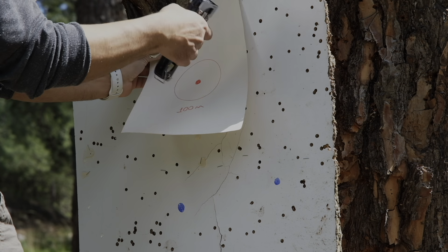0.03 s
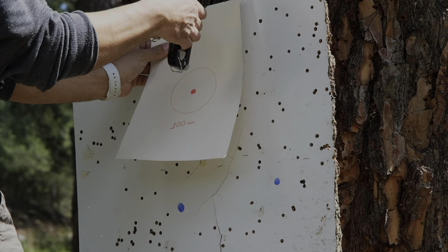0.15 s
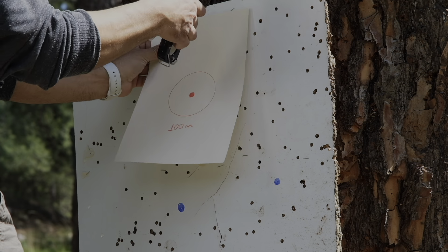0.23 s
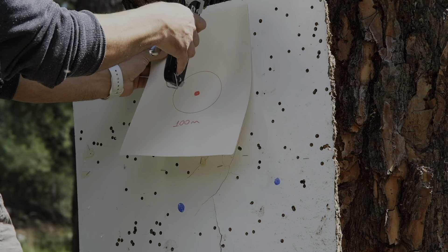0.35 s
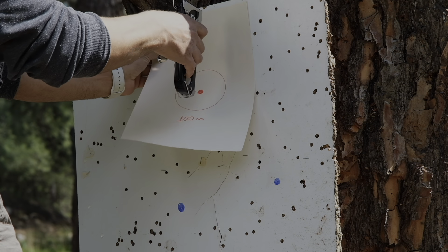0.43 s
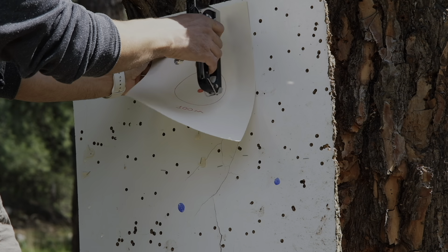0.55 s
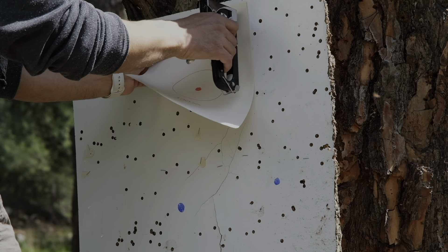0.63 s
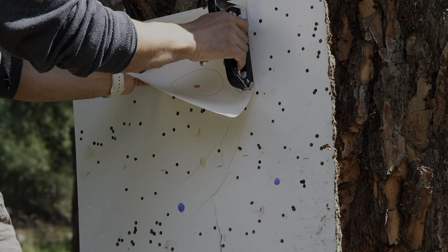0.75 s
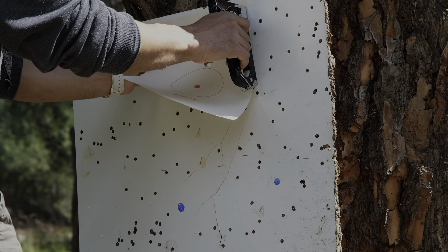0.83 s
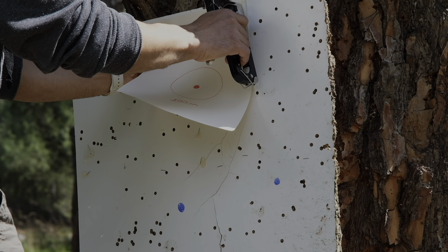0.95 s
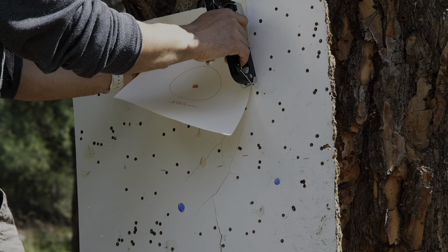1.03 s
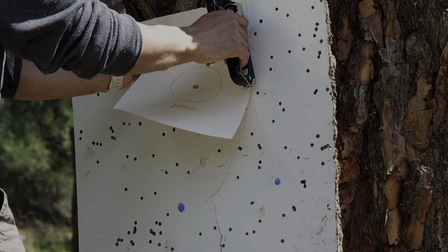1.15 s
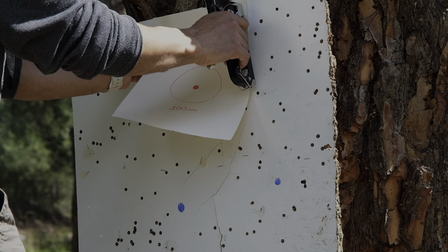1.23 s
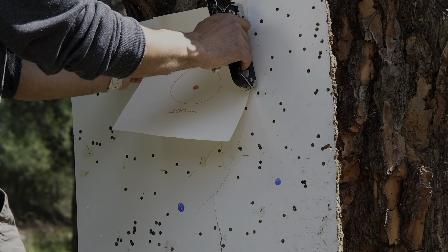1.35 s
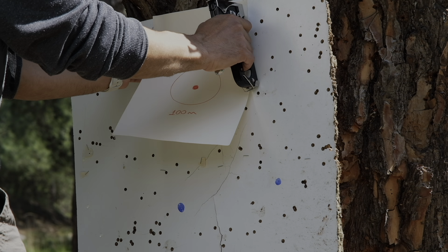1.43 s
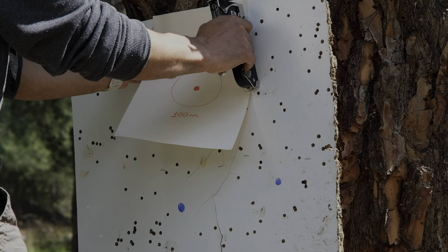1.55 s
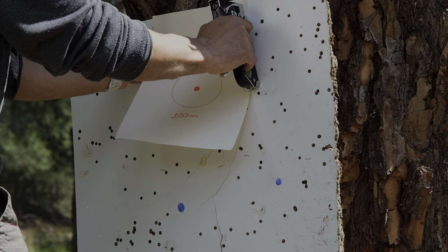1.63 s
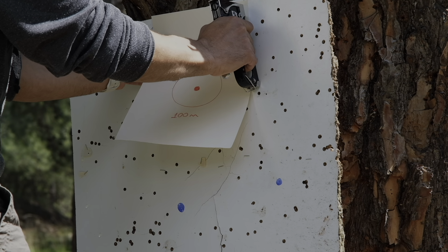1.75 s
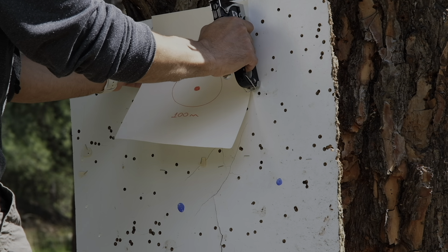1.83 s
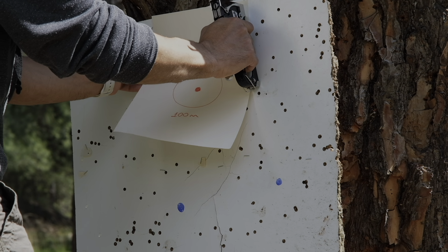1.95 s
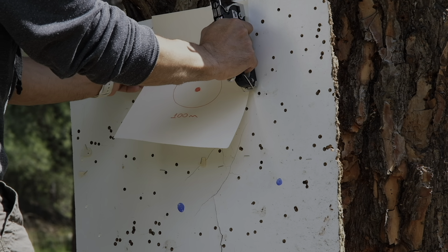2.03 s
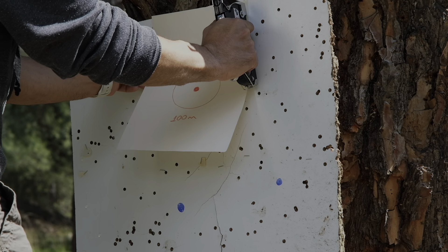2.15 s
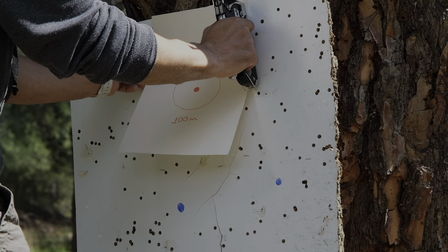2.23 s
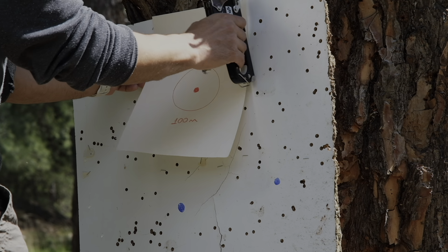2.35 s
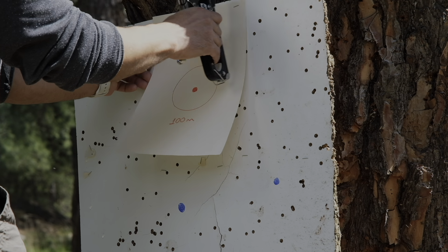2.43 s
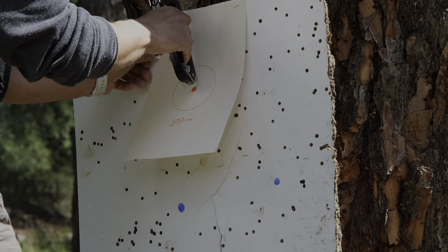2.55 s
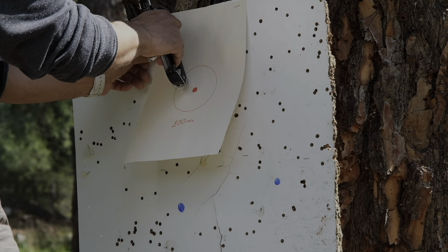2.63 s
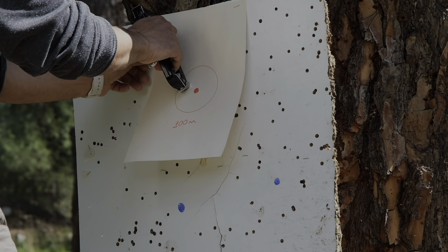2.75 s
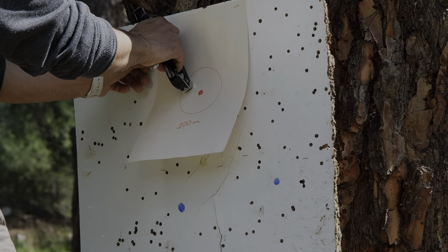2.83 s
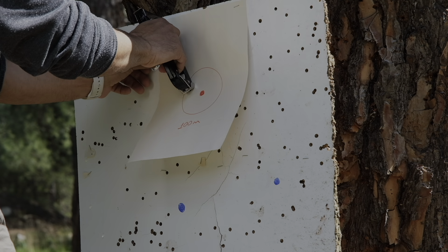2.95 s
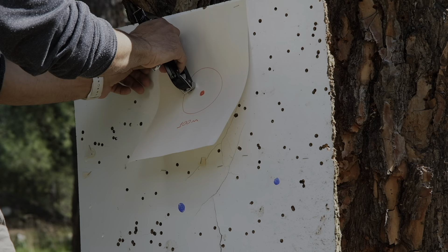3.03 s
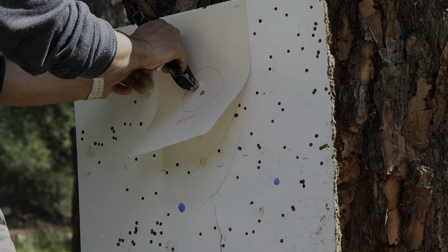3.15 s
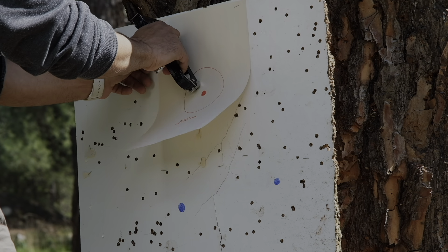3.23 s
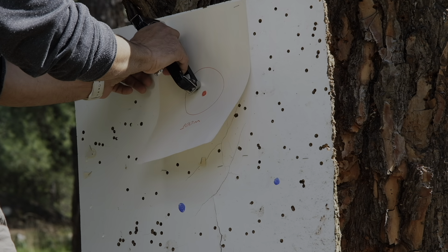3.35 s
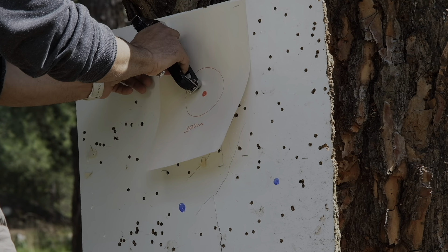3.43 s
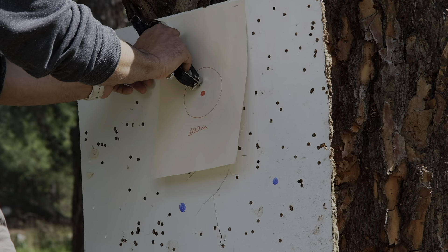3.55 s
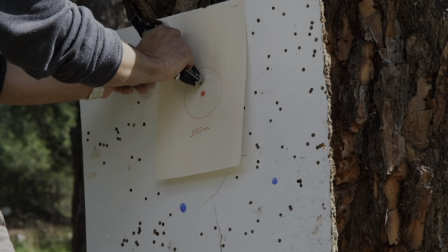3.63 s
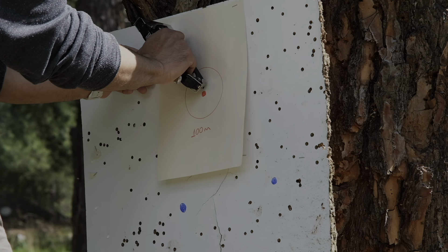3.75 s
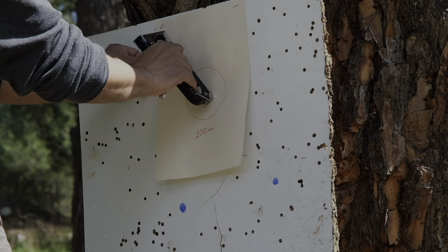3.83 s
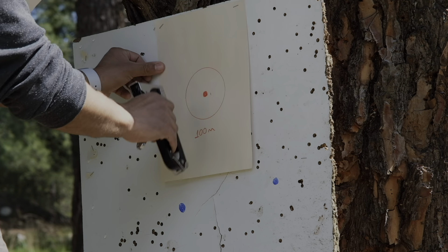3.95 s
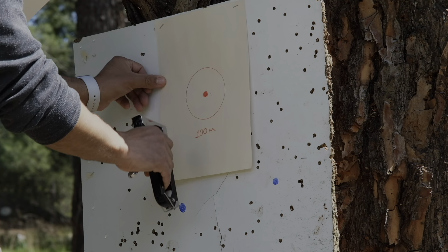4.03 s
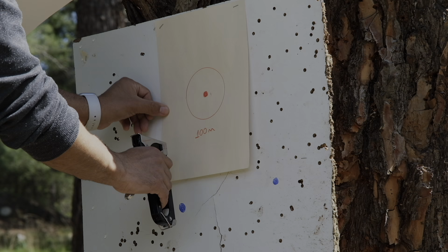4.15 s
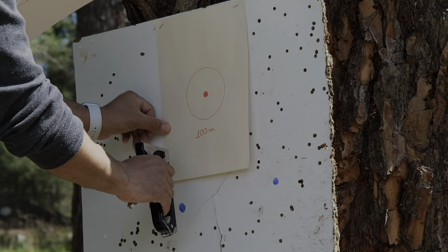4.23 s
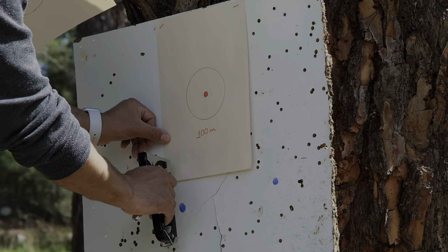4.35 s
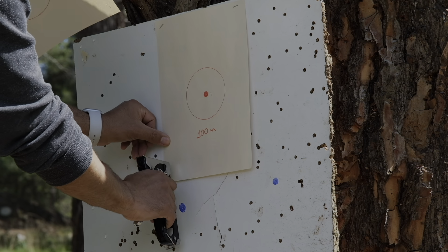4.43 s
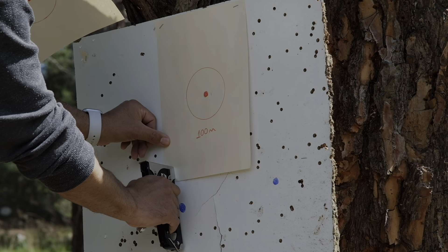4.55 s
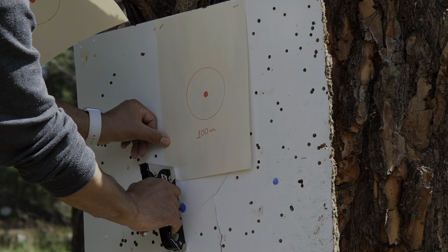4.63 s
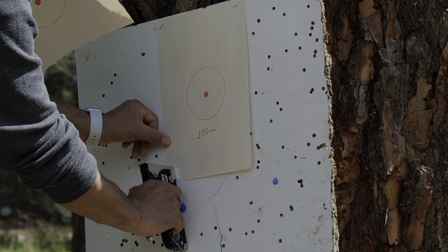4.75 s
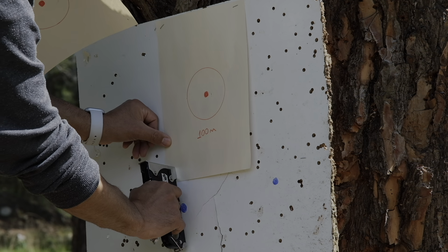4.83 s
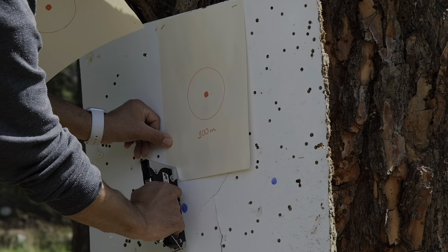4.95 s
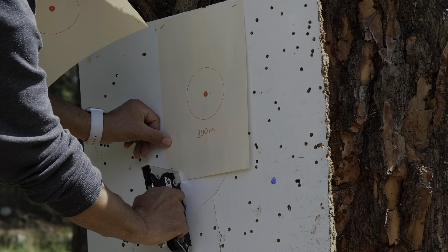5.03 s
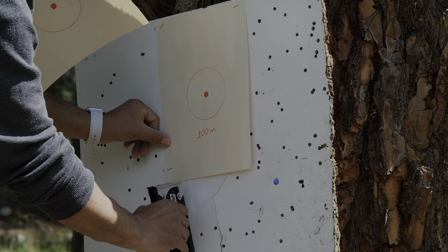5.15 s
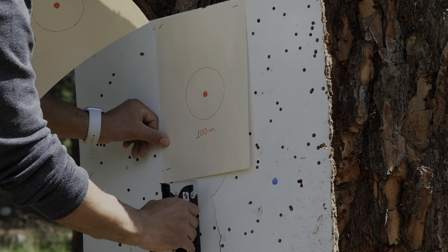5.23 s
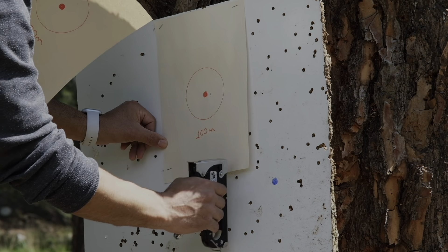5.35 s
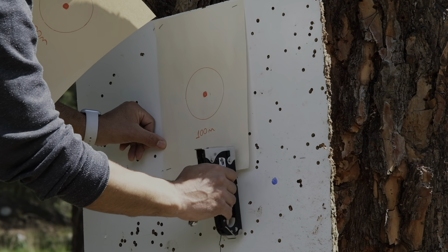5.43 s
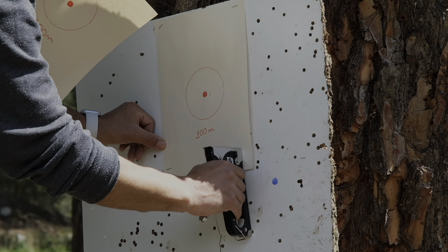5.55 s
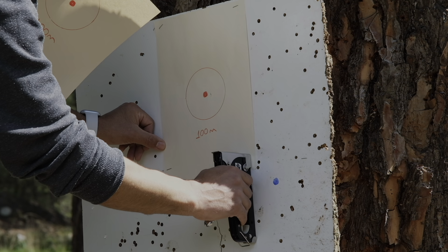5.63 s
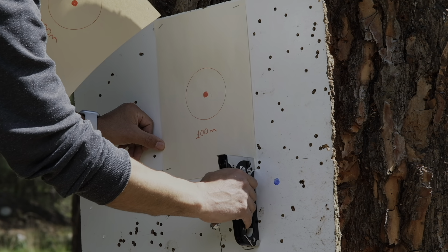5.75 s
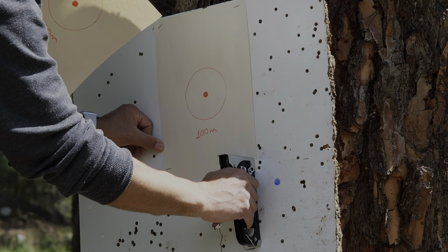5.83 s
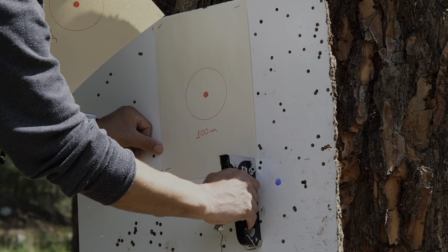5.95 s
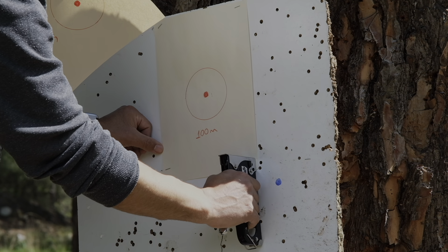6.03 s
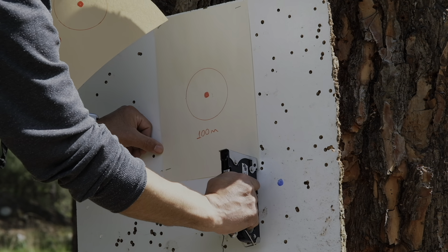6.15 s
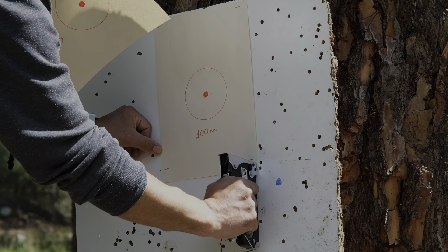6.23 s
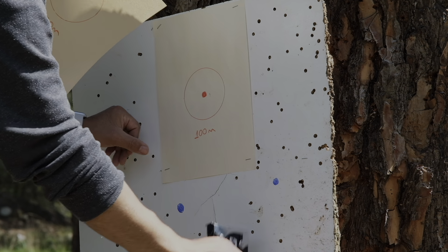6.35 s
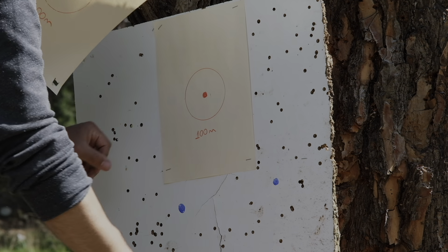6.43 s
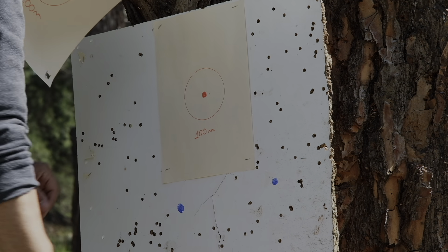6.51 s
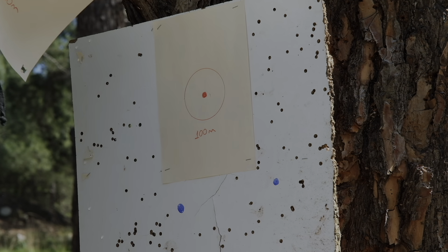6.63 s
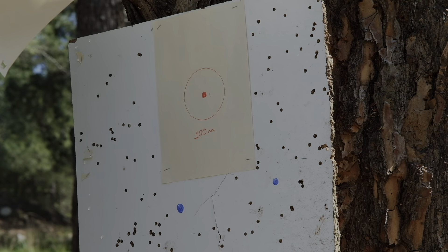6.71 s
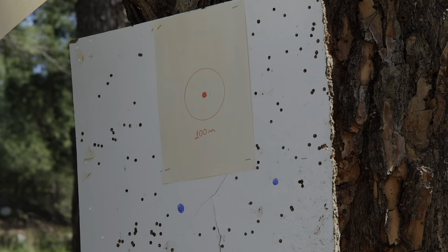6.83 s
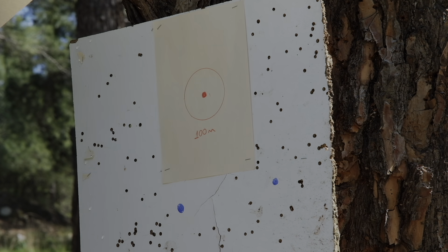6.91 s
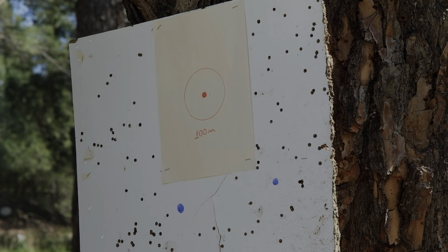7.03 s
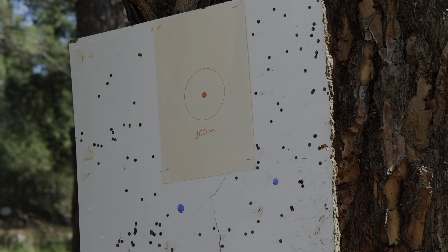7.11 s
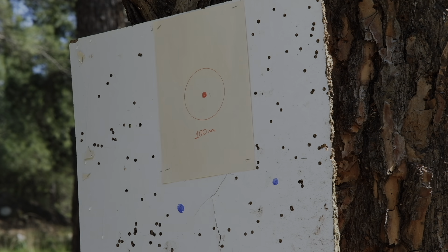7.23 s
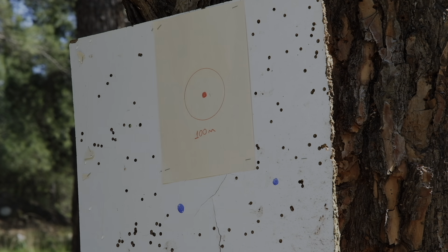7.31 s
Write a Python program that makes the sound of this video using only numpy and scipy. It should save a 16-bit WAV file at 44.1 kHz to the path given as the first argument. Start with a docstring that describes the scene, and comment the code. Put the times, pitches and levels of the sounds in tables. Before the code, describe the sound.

A quiet wood, with very soft wind in the treetops and faint low gusts throughout. For the first two seconds there are only slight paper rustles, small metal ticks and a light bump. Then a hand stapler, close by, fires into a board at about 2.1, 3.6, 4.9 and 6.2 seconds. Each shot is a tiny latch click running into a sharp steel snap, with a thump, a brief spring ring and a slight echo off the trunks; the last two thump harder. The handle returns with a fainter click about a quarter second after each. The tool knocks dully on the board, most clearly at 2.3, 3.8 and 5.1 seconds, and paper slides briefly at 3.8. A small bird gives thin, faint chirps far off around 5.5 seconds. Loose parts tick until about 6.7, leaving soft wind and a faint rustle to the end, near 7.4 seconds.

```python
"""A hand stapler tacks a paper target to a board on a tree, four times, in a quiet wood.
Each squeeze trips a latch, then the driver snaps into the board and the steel frame and spring ring.
The tool knocks on the board, its handle rubs back and clicks home, and loose parts tick.
Paper rustles and the trunks scatter each snap. Behind it all, wind roars softly in the crowns,
hisses in the leaves and rumbles in gusts, and a small bird calls far off."""
import sys
import numpy as np
from scipy import signal
from scipy.fft import rfft, irfft
from scipy.io import wavfile
from scipy.ndimage import uniform_filter1d

SR = 44100
rng = np.random.default_rng(int(sys.argv[2]) if len(sys.argv) > 2 else 0)


def wrap_up_sound(samples):
    """Save the sound to the file named by the first command line argument, as 16-bit audio."""
    columns = np.atleast_2d(samples).T
    # keep every value between -1 and 1, then stretch to whole-number steps
    tamed = np.clip(columns, -1, 1)
    steps = np.round(tamed * 32767).astype(np.int16)
    wavfile.write(sys.argv[1], SR, steps)


N = 325335

# bright chatter of small steel parts: freq_hz, level_db
CHATTER_SPECTRUM = [(150, -22.5), (450, -9.5), (800, -10), (1400, 0.5), (2000, -3), (3000, -2), (4500, 0),
                    (5500, -11), (7500, -2), (9200, -2.5), (12000, -11), (16000, -19)]
# the board's lowest, lingering modes: freq_hz, level_db
BOOM_SPECTRUM = [(80, -34.5), (150, -14.5), (190, 1), (240, -2.5), (300, -12), (600, -26), (2000, -59.5)]


def amp(db):
    """Decibels to gain."""
    return 10 ** (np.asarray(db) / 20)


def unit_rms(x):
    """Scales to rms 1."""
    return x / np.sqrt(np.mean(x ** 2) + 1e-20)


def curve_at(points, hz):
    """Reads a curve on a log-frequency axis."""
    freqs, values = np.transpose(points)
    return np.interp(np.log(hz + 1), np.log(freqs + 1), values)


def clock(size=16384):
    """Seconds since the start of a sound."""
    return np.arange(size) / SR


def add(mix, start_s, sound):
    """Mixes a sound in at start_s."""
    part = mix[max(round(start_s * SR), 0):][:len(sound)]
    part += sound[:len(part)]


def body(spectrum, tilt_db=0, pitch=1, size=4096):
    """Minimum-phase impulse response of unit energy; tilt_db is per octave above 500 Hz."""
    hz = np.fft.rfftfreq(size, 1 / SR)
    treble_db = tilt_db * np.log2(np.maximum(hz, 500) / 500)
    log_gain = np.log(amp(curve_at(spectrum, hz / pitch) + treble_db))
    log_response = signal.hilbert(np.r_[log_gain, log_gain[-2:0:-1]]).conj()
    impulse = np.fft.ifft(np.exp(log_response)).real[:size // 2]
    return impulse / np.linalg.norm(impulse)


def through(x, impulse):
    """Passes x through an impulse response."""
    return signal.fftconvolve(x, impulse)[:len(x)]


def noise(spectrum):
    """Steady coloured noise of rms 1."""
    gain = amp(curve_at(spectrum, np.fft.rfftfreq(N, 1 / SR)))
    return unit_rms(irfft(rfft(rng.standard_normal(N)) * gain, N))


def waver(depth_db, rate_hz):
    """A randomly wandering gain."""
    spectrum = rfft(rng.standard_normal(N)) * np.exp(-(np.fft.rfftfreq(N, 1 / SR) / rate_hz) ** 2)
    return amp(depth_db * unit_rms(irfft(spectrum, N)))


def rattle(rise_s, t60_s, impulse):
    """A dense, evenly spread cluster of modes that swells and dies away."""
    t = clock()
    envelope = np.minimum(t / rise_s, 1) ** 2 * amp(-60 * np.maximum(t - rise_s, 0) / t60_s)
    burst = rfft(envelope * rng.standard_normal(len(t)), 2 * len(t))
    flattened = burst / np.sqrt(uniform_filter1d(abs(burst) ** 2, size=500) + 1e-20)
    coloured = through(irfft(flattened)[:len(t)], impulse)
    return coloured * np.linalg.norm(envelope) / np.linalg.norm(coloured)


def mode(hz, t60_s):
    """One dying resonance; the air follows its acceleration, so it carries no deep bass."""
    t = clock()
    swing = np.sin(2 * np.pi * hz * t) * np.exp(-np.log(1000) * t / t60_s)
    onset = 1 - np.exp(-2 * hz * t)
    return np.gradient(swing * onset) * SR / (2 * np.pi * hz)


def ring(modes, spread, lag_s):
    """A set of modes; the grip detunes them a little, and each takes up the blow within lag_s."""
    out = np.zeros(len(clock()))
    for hz, level_db, t60_s in modes:
        start_s = lag_s * rng.random()
        detune = 1 + spread * rng.uniform(-1.3, 1)
        add(out, start_s, amp(level_db) * mode(hz * detune, t60_s))
    return out


def wind():
    """An easing roar in distant crowns, one swell of hiss in near foliage, gusts at the microphone."""
    # colours of the roar, the leaf hiss and the gust rumble: freq_hz, level_db
    roar_spectrum = [(26, -30.5), (45, -2), (80, 3), (130, -4.5), (220, -4.5), (300, -9), (650, -4),
                     (950, -5.5), (1450, -10.5), (2200, -22), (4000, -28), (9000, -33.5), (16000, -36)]
    leaf_spectrum = [(1000, -24.5), (3500, -15), (5200, 6), (6200, 1.5), (7500, 0), (10000, -10.5),
                     (16000, -28.5)]
    gust_spectrum = [(8, 3), (20, 2), (40, -13), (80, -20), (200, -35), (1000, -85.5)]
    # rise and fall of the gusts: time_s, level_db
    gust_levels = [(0, -55.5), (.4, -58.5), (.62, -50), (1.3, -58.5), (2.05, -62), (2.6, -71), (3.4, -69),
                   (4.55, -62), (5.2, -69), (7.38, -75)]
    t = clock(N)
    roar_db = -64 - 0.15 * t
    leaves_db = -82 - 2.1 * abs(t - 4.8)  # crests at 4.8 s
    roar = amp(roar_db) * noise(roar_spectrum) * waver(depth_db=.45, rate_hz=6.5)
    leaves = amp(leaves_db) * noise(leaf_spectrum) * waver(depth_db=1.8, rate_hz=70)
    gusts = amp(np.interp(t, *np.transpose(gust_levels))) * noise(gust_spectrum)
    return roar + leaves + gusts


def bird():
    """Thin, tick-like calls far off: a whistle that drops to the same note in a few milliseconds."""
    # calls: start_s, level_db, start_pitch_hz
    chirps = [(.238, -74, 5960), (5.465, -63.5, 7610), (5.517, -69.5, 6580), (5.705, -65.5, 6300)]
    end_hz, samples = 4700, 260
    out = np.zeros(N)
    for start_s, level_db, start_hz in chirps:
        glide_hz = np.geomspace(start_hz, end_hz, samples)
        whistle = np.sin(2 * np.pi * np.cumsum(glide_hz) / SR)
        add(out, start_s, amp(level_db) * whistle * signal.windows.tukey(samples, .5))
    return out


def tree_echo(x, colour, delay_s, decay_scale):
    """Diffuse echo of trunks and ground, fully in after delay_s; the mids hang on longest."""
    # how long the trees hold a sound at decay_scale 1: freq_hz, t60_s
    wood_decay = [(150, .5), (1000, 0.99), (4000, 0.25), (8000, 0.46), (15000, .35)]
    hz, t, frames = signal.stft(x, SR, nperseg=256)
    # each trunk faces another side of the source, so fine colour averages out
    power = uniform_filter1d(abs(frames) ** 2, size=3, axis=0)
    power[12:] = uniform_filter1d(power, size=9, axis=0)[12:]  # smoother above 2 kHz
    t = t[t < 1]
    t60_s = decay_scale * curve_at(wood_decay, hz)[:, None]
    onset = np.clip(2 * t / delay_s - 1, 0, 1)
    tail = (onset * np.exp(-np.log(1000) * t / t60_s)) ** 2
    power = signal.fftconvolve(power, tail / tail.sum(1, keepdims=True), axes=1)[:, :frames.shape[1]]
    scatter = rng.standard_normal(frames.shape) + 1j * rng.standard_normal(frames.shape)
    echo = np.sqrt(abs(power)) * amp(curve_at(colour, hz))[:, None] * scatter
    return signal.istft(echo, SR, nperseg=256)[1][:N]


def rub(length_s, tilt_db):
    """Clumped friction grains under a short stroke."""
    # dry, papery scrape: freq_hz, level_db
    friction_spectrum = [(300, -25), (1500, 2.5), (3000, 3.5), (4500, 1), (5600, -13), (8000, -4.5),
                         (11000, -14), (16000, -22)]
    n = int(length_s * SR)
    clumps = amp(3 * unit_rms(uniform_filter1d(rng.standard_normal(n), size=120)))
    grains = unit_rms(through(clumps * rng.standard_normal(n), body(friction_spectrum, tilt_db)))
    return grains * np.sin(np.pi * np.arange(n) / n)


def rustles():
    """Paper and sleeve slide over the board."""
    # slides: start_s, length_s, level_db, tilt_db_per_octave
    slides = [(0.126, 0.052, -64.5, -2), (0.741, 0.026, -70, 0), (0.989, 0.096, -75.5, -0.5),
              (1.418, .05, -73, -5), (2.769, 0.16, -73, 0), (3.139, 0.098, -76.5, -1),
              (3.83, 0.06, -51.5, -2), (5.573, 0.13, -75.5, 6), (7.2, 0.23, -78.5, 4)]
    out = np.zeros(N)
    for start_s, length_s, level_db, tilt_db in slides:
        add(out, start_s, amp(level_db) * rub(length_s, tilt_db))
    return out


def board(pitch, shudder_db, shudder_t60_s):
    """A dead thud of the board, then the low shudder of the whole sheet."""
    # colours of the thud and the shudder: freq_hz, level_db
    thud_spectrum = [(40, -35.5), (130, -13), (230, 4), (300, -10), (400, 3), (560, 6), (750, 2.5),
                     (900, -7), (1150, -2.5), (1800, -18.5), (3000, -31), (6000, -42.5), (16000, -69.5)]
    shudder_spectrum = [(50, -23), (130, -6.5), (210, -7.5), (300, -5.5), (450, 3), (750, -7.5),
                        (1300, -21), (3000, -32), (16000, -59)]
    thud = body(thud_spectrum, pitch=pitch)
    out = amp(shudder_db) * rattle(0.0014, shudder_t60_s, body(shudder_spectrum))
    add(out, 0, thud / abs(thud).max())
    return out


def knock(force_db, pitch):
    """A thud, a short boom and a steel tick; soft, low contacts scuff more than they knock."""
    firm_db, softness_db = -21, 16 * (1 - pitch)
    shudder_db = -22.5 + 1.91 * softness_db
    tick_db = -41.5 + 1.4 * (force_db - firm_db) - 0.87 * softness_db  # light knocks lose the tick first
    thud = amp(force_db - softness_db) * board(pitch, shudder_db, shudder_t60_s=0.12)
    boom = amp(force_db - 31) * rattle(0.0013, 0.18, body(BOOM_SPECTRUM, pitch=.93))
    tick = amp(tick_db) * rattle(.0005, 0.031, body(CHATTER_SPECTRUM, tilt_db=-6.0))
    return thud + boom + tick


def knocks():
    """The tool meets the board and often rocks back for a second, lighter contact."""
    # contacts: start_s, force_db, pitch_ratio, rock_back_s
    contacts = [(1.524, -42.5, .9, 0.0026), (2.2898, -22, 1, 0.0037), (3.259, -46.5, 0.81, 0.0018),
                (3.7490, -39, 0.8, 0.016), (3.848, -21, 0.92, 0), (4.6019, -35, .66, .0606),
                (4.9981, -30.5, 0.51, 0.014), (5.1053, -19, 1, 0.0004), (5.164, -38.5, 0.41, 0.012),
                (5.6265, -34.5, 0.58, 0.074), (6.2272, -26, .84, 0.024)]
    out = np.zeros(N)
    for start_s, force_db, pitch, rock_back_s in contacts:
        add(out, start_s, knock(force_db, pitch))
        if rock_back_s > .005:
            add(out, start_s + rock_back_s, knock(force_db - 5, pitch))
    return out


def click(ring_hz, ring_db, t60_s, tilt_db):
    """Small steel parts catch and chatter for a few milliseconds; one of them rings."""
    out = rattle(.0006, t60_s, body(CHATTER_SPECTRUM, tilt_db))
    add(out, 0.00084, amp(ring_db + 6) * mode(ring_hz, t60_s / 2))
    return out


def mechanism():
    """Each squeeze trips the latch; let go, the handle rubs back and clicks home. Loose parts tick."""
    # latch trips and handle returns: start_s, ring_hz, ring_db
    latches = [(2.0266, 3334, 3.5), (3.5850, 3600, -6.5), (4.8812, 4080, -3.5), (6.1416, 4180, -9)]
    handles = [(2.4076, 2820, -7.5), (3.8750, 4520, -5.5), (5.187, 1400, -2), (6.3851, 4540, 2)]
    # loose parts as the tool is moved: start_s, level_db, tilt_db_per_octave
    ticks = [(.5530, -56, -0.5), (1.8550, -61.5, -0.5), (2.6137, -58, 5), (4.3180, -64.5, -1),
             (5.3490, -59.5, 3), (6.114, -54, -4.5), (6.4121, -50.5, -2), (6.4800, -55.5, 4),
             (6.5567, -60.5, 2), (6.6813, -50.5, -6)]
    latch_db, handle_db, drag_db, drag_s = -35, -36, -66.5, 0.029
    out = np.zeros(N)
    for start_s, ring_hz, ring_db in latches:
        add(out, start_s, amp(latch_db) * click(ring_hz, ring_db, t60_s=.017, tilt_db=-2.5))
    for start_s, ring_hz, ring_db in handles:
        add(out, start_s - drag_s, amp(drag_db) * rub(drag_s, tilt_db=2))
        add(out, start_s, amp(handle_db) * click(ring_hz, ring_db, t60_s=0.021, tilt_db=0.64))
    for start_s, level_db, tilt_db in ticks:
        add(out, start_s, amp(level_db) * rattle(.0006, .018, body(CHATTER_SPECTRUM, tilt_db)))
    return out


def spring(second_partial_db):
    """Near-harmonic ring of the spring; dry rubbing fades it in a straight line."""
    # the spring's partials: pitch_hz, level_db
    partials = [(672, -4), (1342, 2.5), (2019, -13.5), (2645, -12.5), (4705, -16), (7480, -18.5)]
    rise_s, length_s = 0.0072, .043
    t = clock()
    envelope = np.minimum(t / rise_s, 1) * np.maximum(1 - t / length_s, 0)
    tone = sum(amp(db + second_partial_db * (k == 1)) * np.sin(2 * np.pi * (hz * t + rng.random()))
               for k, (hz, db) in enumerate(partials))
    return envelope * tone


def staples():
    """The driver scrapes down, slams home steel on steel and thumps the board; frame and spring ring."""
    # one row a staple: start_s, tilt_db_per_octave, frame_hz, after_ring_db, thump_db,
    # board_hz, boom_db, spring_db, second_partial_db
    shots = [(2.0875, -0.5, 1503, -7, -23.5, 455, -56, -44, 6.5),
             (3.6355, -1, 1397, -15.5, -26.5, 499, -44, -39, -3),
             (4.9441, -3, 1416, -13, -15, 692, -46, -38.5, 13.5),
             (6.182, -0.3, 1064, -21.5, -14, 680, -54.5, -34, -11)]
    # colours of the crack and of parts and staples shaking in the frame: freq_hz, level_db
    crack_spectrum = [(150, -36.5), (500, -6.5), (1100, -6.5), (1600, 0.5), (2400, -7), (3100, -3.5),
                      (4100, 3.5), (5100, -14), (5800, -14.5), (6700, -4.5), (9200, -1.5), (11000, -8),
                      (12300, -6), (16000, -15.5)]
    shake_spectrum = [(60, -21.5), (150, -9.5), (400, 3), (900, 4), (1400, 7), (1800, -4), (3500, -1.5),
                      (4700, 0), (5700, -5.5), (9500, -1.5), (12500, -9.5), (16000, -19.5)]
    # modes of the steel frame, its faint after-ring and the struck board: pitch_hz, level_db, t60_s
    steel_modes = [(1120, -13.5, 0.019), (1920, -10.5, 0.014), (2750, -14, .02), (3250, -4.5, .018),
                   (3808, 0, 0.012), (4550, -4.5, 0.01), (6520, -7, 0.0095), (7520, -4, .013),
                   (8730, -6.5, 0.013), (9380, -4, 0.013), (10720, -8, 0.014), (12020, -7.5, .011)]
    after_modes = [(1360, -49, 0.54), (3240, -53.5, 0.33), (7520, -51, .4)]
    board_modes = [(244, -19.5, 0.069), (455, -6.5, .035), (533, -11, 0.019)]
    scrape_db, crack_db, frame_db, shake_db = -27, -14, -25, -28  # the spring fires with constant force
    out = np.zeros(N)
    for start_s, tilt_db, frame_hz, after_db, thump_db, board_hz, boom_db, spring_db, second_db in shots:
        add(out, start_s - .0025, amp(scrape_db) * rattle(0.002, .008, body(CHATTER_SPECTRUM)))
        add(out, start_s, amp(crack_db) * rattle(0.00045, 0.015, body(crack_spectrum, tilt_db)))
        add(out, start_s, amp(crack_db) * ring(steel_modes, spread=.015, lag_s=.0014))
        add(out, start_s, amp(frame_db) * mode(frame_hz, t60_s=0.027))
        add(out, start_s, amp(shake_db) * rattle(.004, 0.052, body(shake_spectrum, tilt_db)))
        add(out, start_s, amp(after_db) * ring(after_modes, spread=.002, lag_s=0.0017))
        thud = amp(-5.5) * board(pitch=1.2, shudder_db=-16.5, shudder_t60_s=0.099)
        board_ring = ring(board_modes, spread=0.022, lag_s=.0001)
        board_note = amp(-2) * mode(board_hz, t60_s=.036)
        add(out, start_s - .001, amp(thump_db) * (thud + board_ring + board_note))
        add(out, start_s, amp(boom_db - 2.5) * rattle(.012, .22, body(BOOM_SPECTRUM)))
        add(out, start_s + 0.0033, amp(spring_db) * spring(second_db))
    return out


def scene():
    """The stapler close by, a brief scatter off the trees, a lingering forest tail, a bird and wind."""
    # colours of the brief scatter and the lingering tail: freq_hz, level_db
    short_colour = [(100, -7), (400, -2), (1200, -2.5), (3000, -4), (7000, 1.5), (10000, -5),
                    (16000, -10.5)]
    long_colour = [(100, -6.5), (400, -5), (1200, -2.5), (3000, 3), (7000, 5.5), (10000, -7.5),
                   (16000, -11.5)]
    tool = staples() + mechanism() + knocks() + rustles()
    short_echo = amp(-32.5) * tree_echo(tool, short_colour, delay_s=0.042, decay_scale=0.37)
    short_echo *= waver(depth_db=1.5, rate_hz=130)  # the echo returns trunk by trunk
    long_echo = amp(-33.5) * tree_echo(tool, long_colour, delay_s=0.022, decay_scale=1.0)
    long_echo *= waver(depth_db=2.0, rate_hz=60)
    calls = bird()
    call_echo = amp(-8) * tree_echo(calls, long_colour, delay_s=0.0067, decay_scale=0.22)
    return (tool + short_echo + long_echo + calls + call_echo + wind())[None]


def record(dry):
    """A steep low-pass trims the very top of the treble."""
    cutoff_hz = 16200
    lowpass = signal.firwin(255, cutoff_hz, window=("kaiser", 9), fs=SR)
    return signal.oaconvolve(dry, lowpass[None], "same")


dry = scene()
out = record(dry)
wrap_up_sound(out)
```